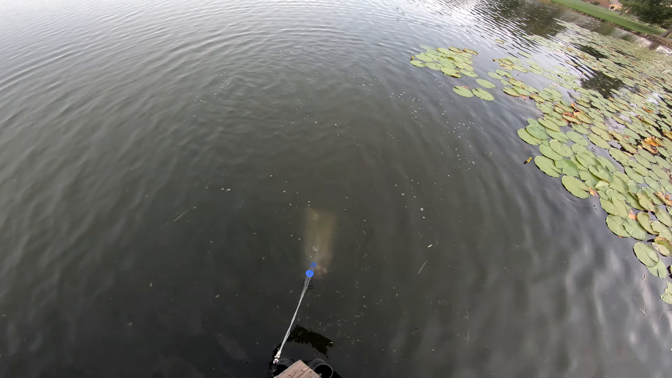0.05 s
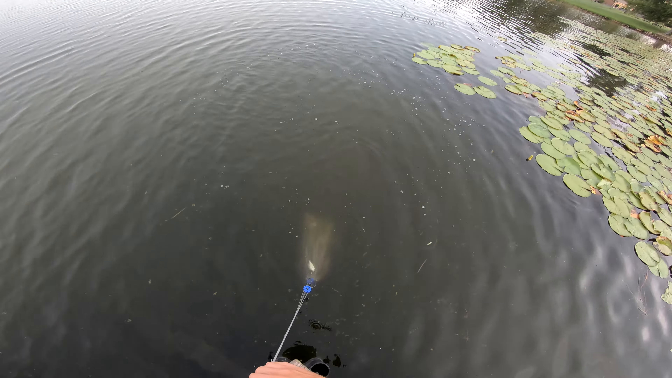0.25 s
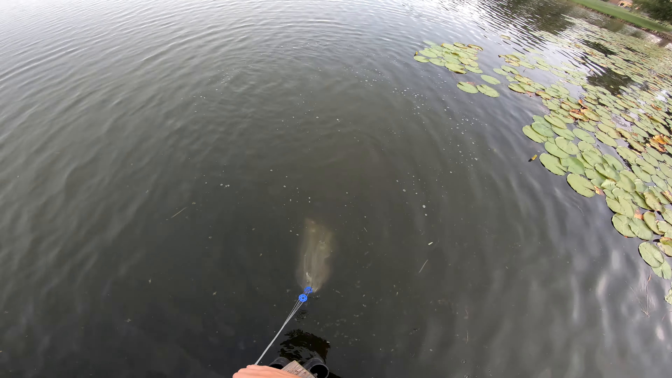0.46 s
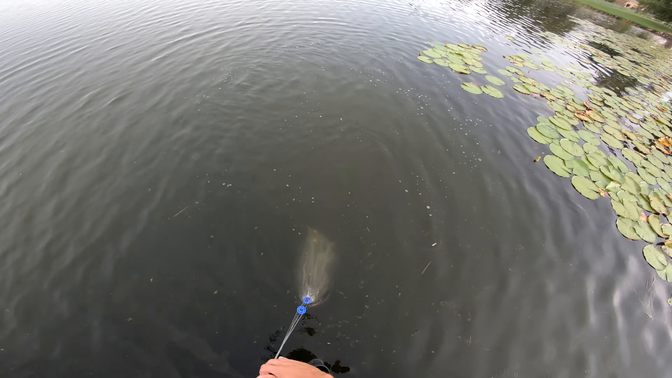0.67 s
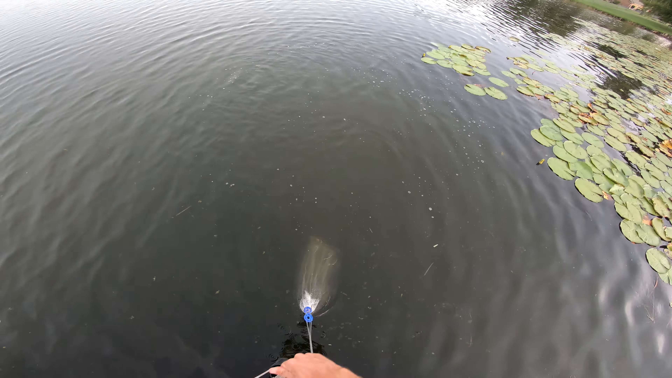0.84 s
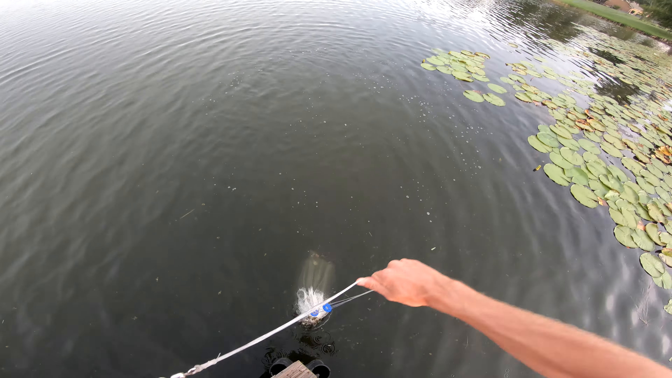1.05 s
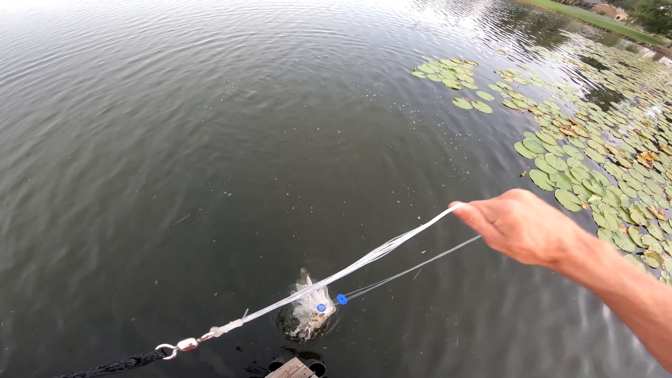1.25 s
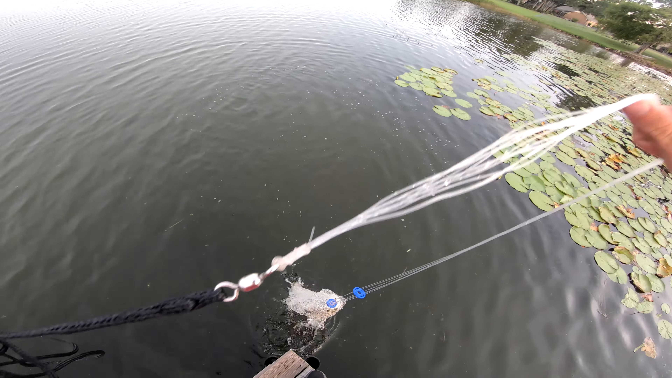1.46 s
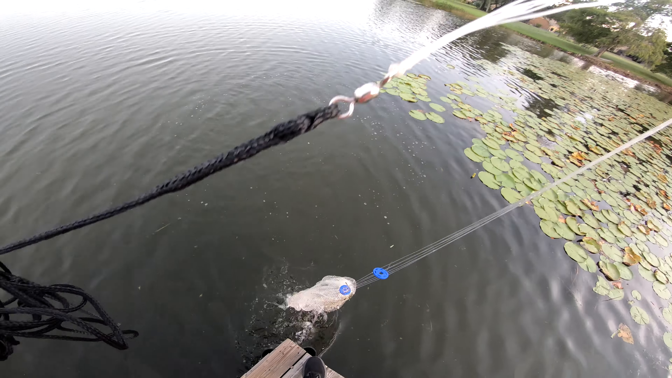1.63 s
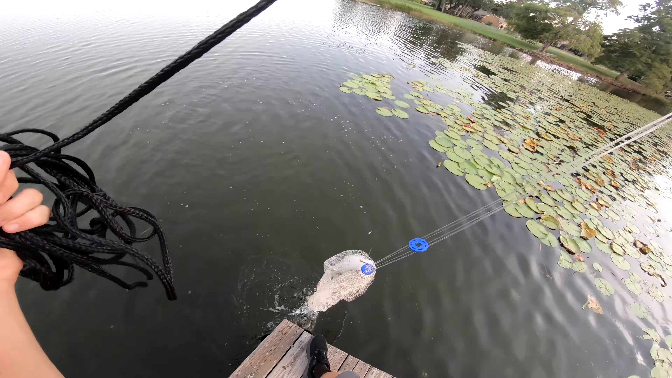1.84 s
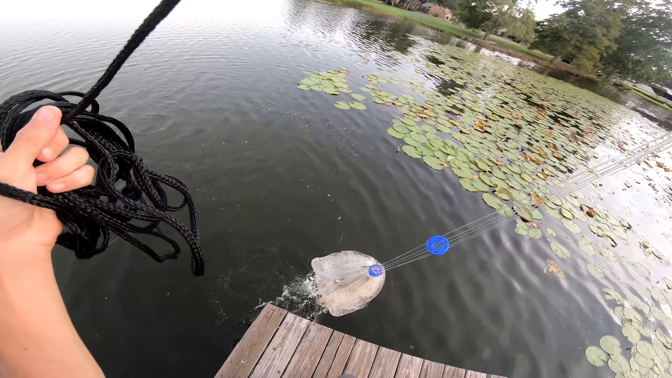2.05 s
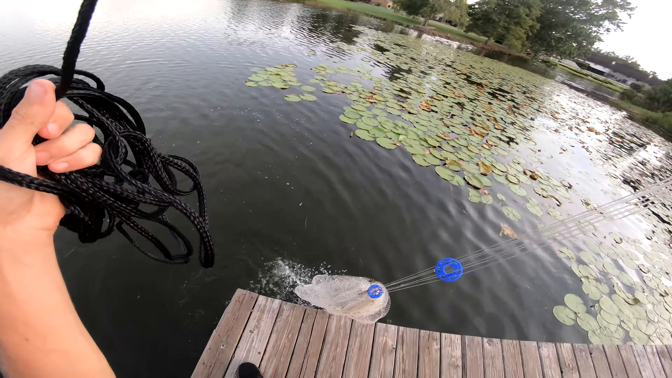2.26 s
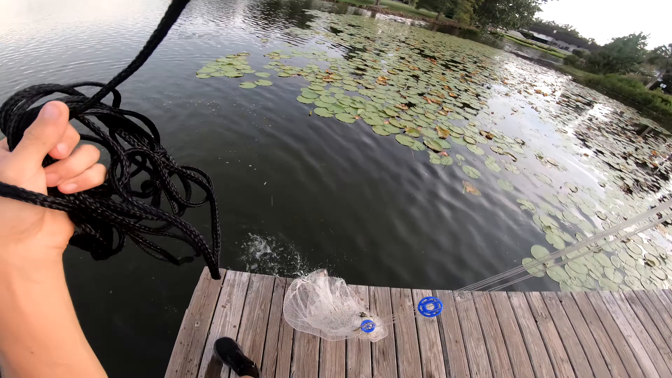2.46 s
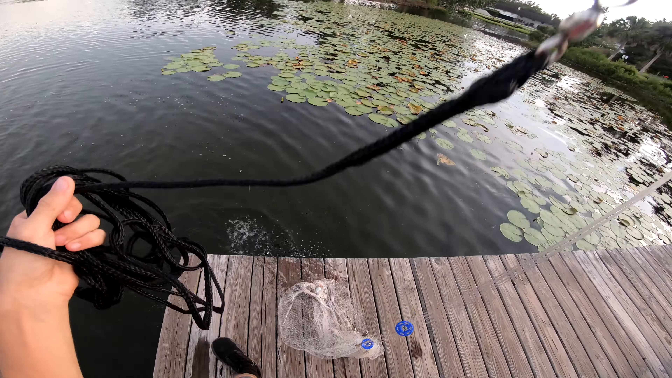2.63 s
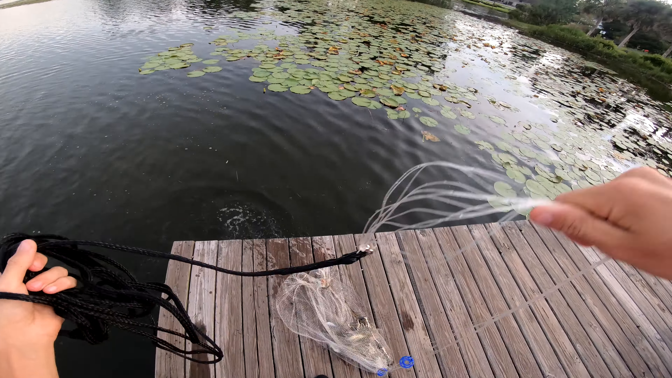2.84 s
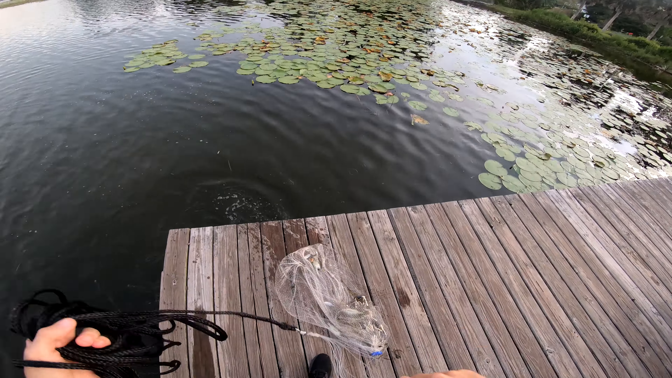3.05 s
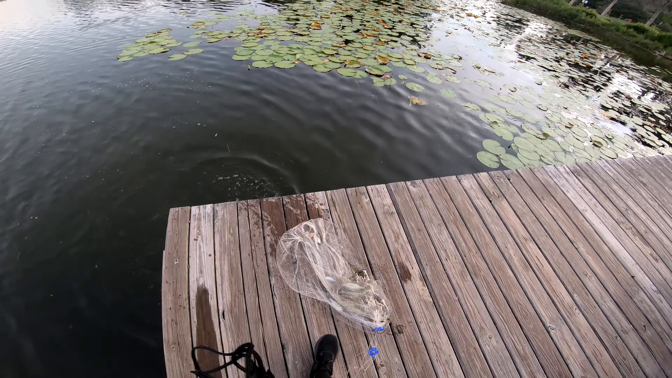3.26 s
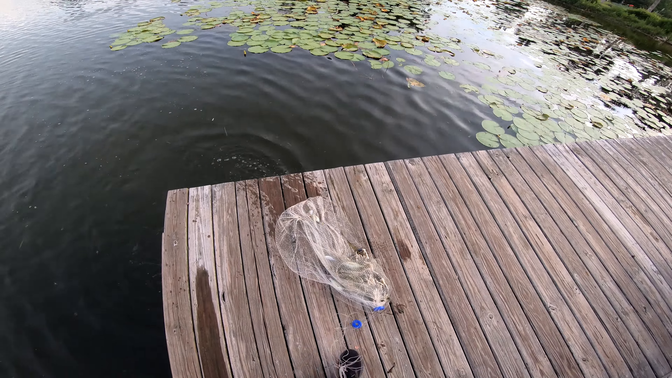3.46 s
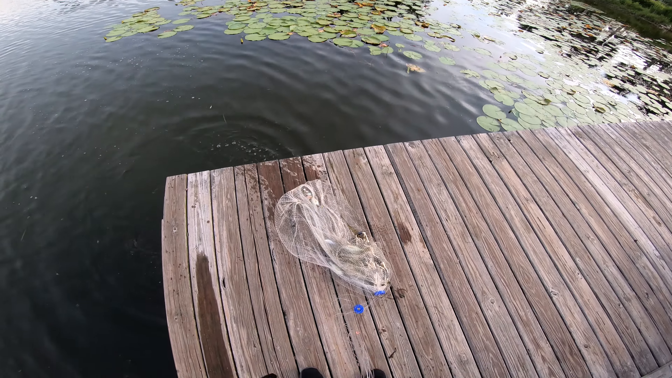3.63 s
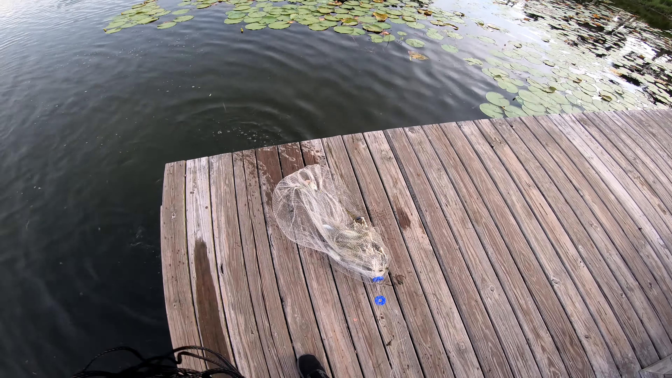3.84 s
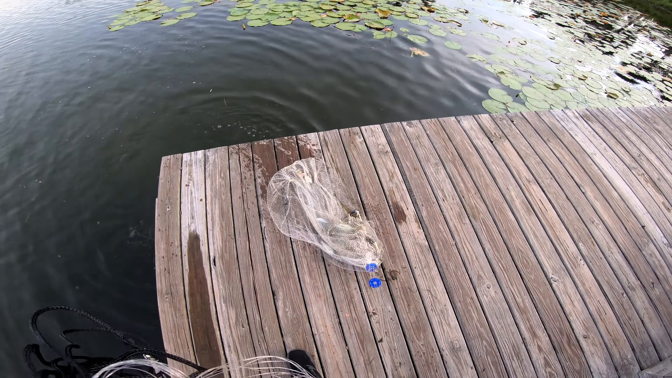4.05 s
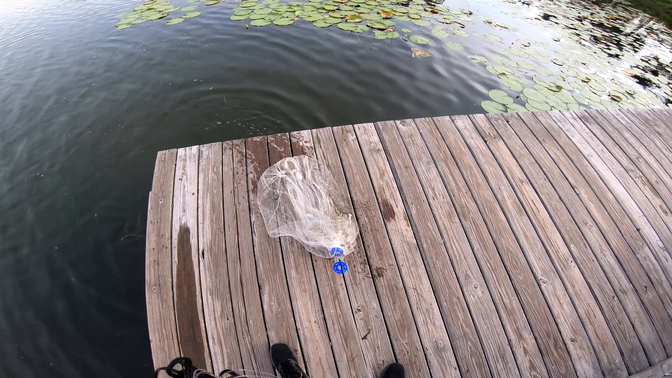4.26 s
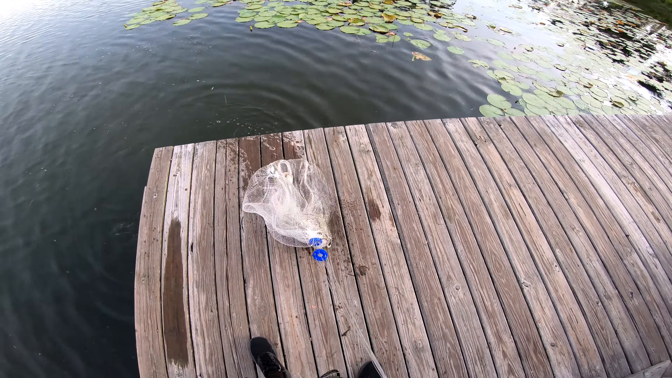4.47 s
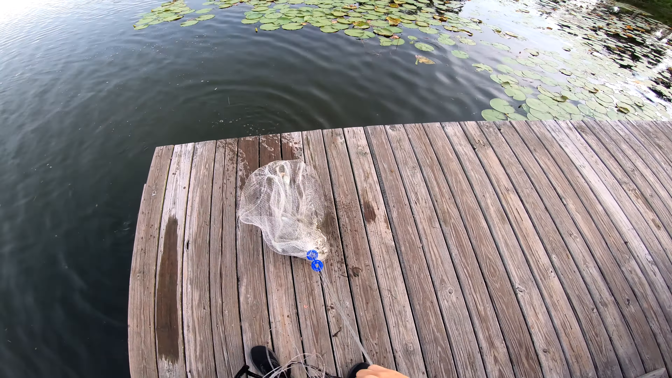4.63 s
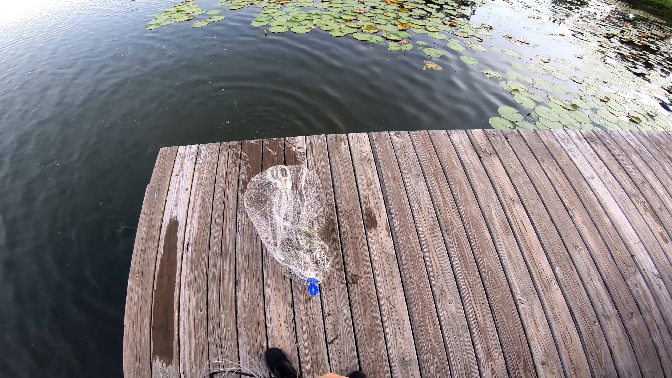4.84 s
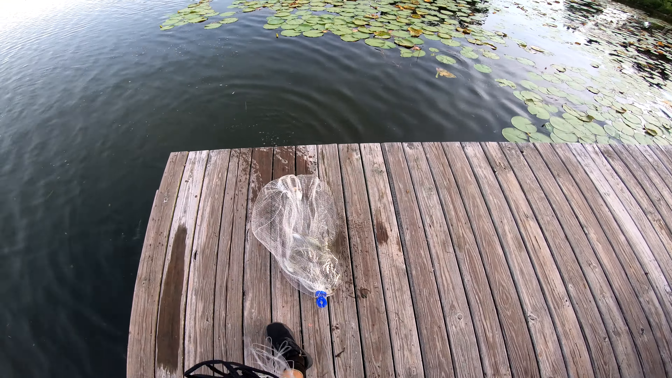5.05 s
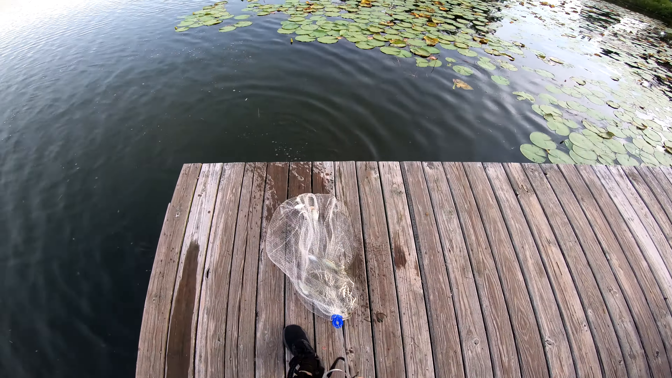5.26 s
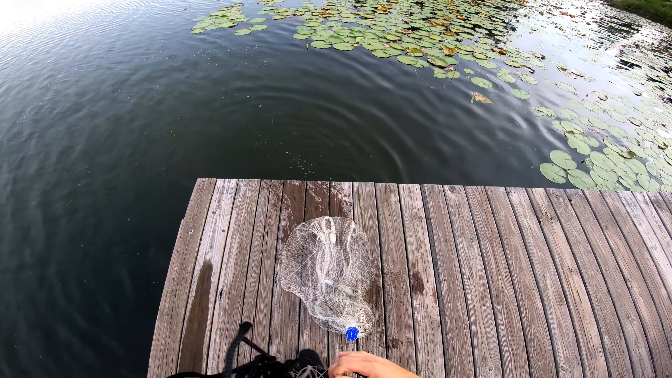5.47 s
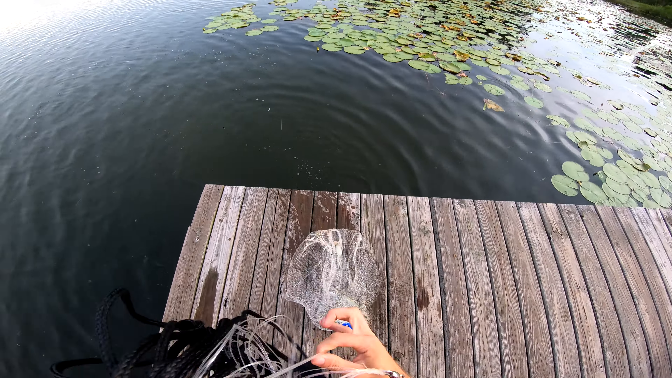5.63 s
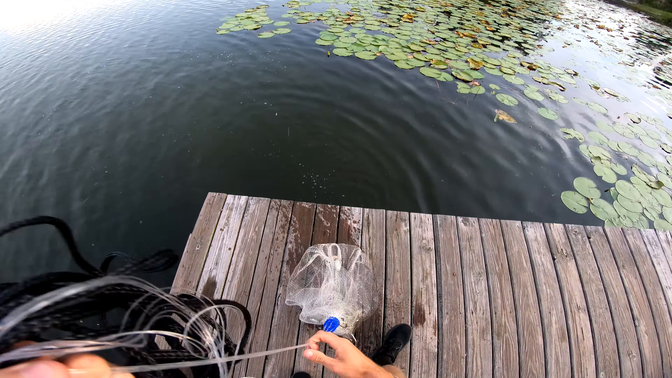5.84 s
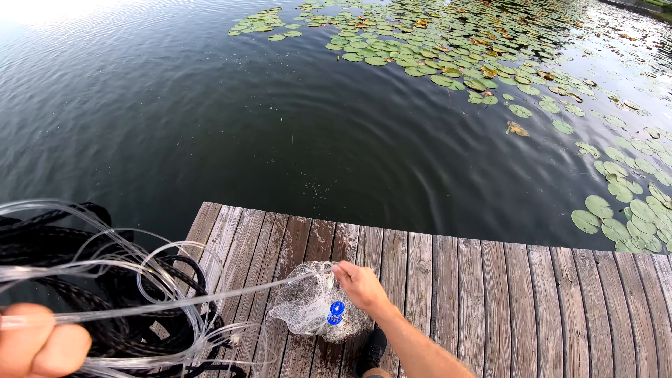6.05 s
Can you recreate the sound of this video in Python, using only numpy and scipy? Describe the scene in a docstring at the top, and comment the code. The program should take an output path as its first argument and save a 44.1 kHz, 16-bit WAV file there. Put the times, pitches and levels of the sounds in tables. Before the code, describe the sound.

Rope scuffs softly and drops tick as a wet cast net is hauled from a pond. Water streams off it, bubbling and spattering, then the lead weights thud and rattle onto a wooden dock while wind bumps the microphone. A plastic piece clacks, the weights land again and the net keeps dripping. The handling sounds are close, with faint birds and a low hum in the distance.

```python
"""A wet cast net is hauled out of a pond and its lead line drops on a plank dock, twice.
Over distant hum and hiss, rope scuffs by friction and drops, lines and rings tick. From 1.3 s water
streams off the net as ringing bubbles and spray. Wind thumps the right microphone port, and at 2.7 s
the weights excite the modes of the planks. Far birds begin to whistle; at 4.4 s the net's plastic horn
clacks, the weights land again and the net drips on. Near sounds are muffled at the left port."""
import sys
import numpy as np
from scipy import signal
from scipy.fft import rfft, irfft
from scipy.io import wavfile
from scipy.ndimage import uniform_filter1d

SR = 44100
rng = np.random.default_rng(int(sys.argv[2]) if len(sys.argv) > 2 else 0)


def int16_out(signal):
    """Quantize to a 16-bit WAV file."""
    q = np.round(np.clip(np.atleast_2d(signal).T, -1, 1) * 32767)
    wavfile.write(sys.argv[1], SR, q.astype(np.int16))


N = 269010

# water streaming off the moving mesh: time_s, gurgle_db, spray_db, fizz_db
WATER_FLOW = [(0.0, -51.5, -58, -60.5), (0.85, -62, -67.5, -70.5), (1.29, -50, -50, -60),
              (1.5, -44, -49, -58), (1.75, -41.5, -46, -54), (2.48, -50, -44, -49), (2.65, -52, -50, -52),
              (2.9, -57, -55.5, -58), (3.36, -62.5, -69, -74), (3.5, -54, -60, -69), (3.84, -64, -61, -64),
              (4.21, -59.5, -60, -60), (4.38, -56, -52, -58), (4.6, -50, -58, -61), (5.03, -62, -66, -63.5),
              (5.6, -56, -64, -62.5), (5.76, -62.5, -62, -68), (6.1, -59, -64, -63)]


def amp(db):
    """Amplitude ratio of a level in decibels."""
    return 10 ** (np.asarray(db) / 20)


def unit_rms(x):
    """Normalisation to unit mean power."""
    return x / np.sqrt(np.mean(x ** 2) + 1e-20)


def spectrum_at(points, hz):
    """Interpolation of a spectrum on a logarithmic frequency axis."""
    point_hz, value = np.transpose(points)
    return np.interp(np.log(hz + 1), np.log(point_hz + 1), value)


def envelopes(rows):
    """Linear interpolation in time of each column after the first."""
    times, *columns = np.transpose(rows)
    return [np.interp(np.arange(N) / SR, times, column) for column in columns]


def coloured(x, colour):
    """Zero-phase filtering by rows of frequency_hz, gain_db."""
    return irfft(rfft(x) * amp(spectrum_at(colour, np.fft.rfftfreq(N, 1 / SR))), N)


def add(mix, start_s, sound):
    """Superposition of a sound on the mix."""
    part = mix[max(round(start_s * SR), 0):][:len(sound)]
    part += sound[:len(part)]


def ring(hz, t60, glide=0., size=4096):
    """Damped oscillation: in t60 seconds it falls 60 dB and its pitch rises by the fraction 2 * glide."""
    t = np.arange(size) / SR
    return np.sin(2 * np.pi * hz * t * (1 + glide * t / t60)) * amp(-60 * t / t60)


def grains(colour, cycles, per_s, spread_db, wash, pitches=12):
    """Shot noise: random impulses ring small resonators over a smooth wash of the same colour."""
    out = np.zeros(N)
    for hz in np.geomspace(colour[1][0], colour[-2][0], pitches):
        sizes = amp(spread_db * np.minimum(rng.exponential(1, N), 5))
        impulses = sizes * (rng.random(N) < per_s / pitches / SR)
        out += signal.oaconvolve(impulses, np.sqrt(hz) * ring(hz, cycles / hz, glide=.17, size=2048))[:N]
    smooth = unit_rms(coloured(rng.standard_normal(N), colour))
    return unit_rms(unit_rms(coloured(out, colour)) + wash * smooth)


def distant_air():
    """Partly coherent noise: the hum is alike at both ports, the drifting hiss largely independent."""
    colour = [(29, -40), (50, 1), (70, 2), (98, -3.5), (140, -1.5), (221, -6.5), (268, -8), (330, -16),
              (718, -25), (1110, -34), (2100, -55), (3000, -48.5), (4000, -43), (5500, -47.5),
              (7000, -53.5), (7700, -42), (9500, -43), (11000, -56.5), (15500, -67)]  # hum and hiss: frequency_hz, level_db
    likeness = [(60, 0.97), (180, 1), (550, 0.81), (1650, 0.033), (4970, 0.07), (15000, 0.31)]  # between the ports: frequency_hz, coherence
    balance = [(60, 0), (380, -3), (900, 6.5), (2400, 12), (6500, 6), (7800, -25.5), (15000, -25)]  # frequency_hz, left_minus_right_db
    insects = [(0, -1), (1.5, -1.), (3.2, -0.5), (4.6, 1.5), (5.4, 3.5), (6.1, 3)]  # swell of the high hiss: time_s, gain_db
    frames, hz = N // 256 + 5, np.fft.rfftfreq(1024, 1 / SR)
    right_re, right_im, own_re, own_im, patches = rng.standard_normal((frames, 513, 5)).T
    patches = unit_rms(uniform_filter1d(uniform_filter1d(patches, 14, axis=0), 16, axis=1))
    coherence = np.clip(spectrum_at(likeness, hz), -1, 1)[:, None]
    right = right_re + 1j * right_im
    left = coherence * right + np.sqrt(1 - coherence ** 2) * (own_re + 1j * own_im)
    swell_db = (hz > 7400)[:, None] * np.interp(np.arange(frames) * 256 / SR, *np.transpose(insects))
    lean_db = spectrum_at(balance, hz)[:, None] / 2
    level_db = spectrum_at(colour, hz)[:, None] + swell_db + 1.05 * patches
    spectra = np.array([left * amp(level_db + lean_db), right * amp(level_db - lean_db)])
    return amp(-42) * unit_rms(signal.istft(spectra, nperseg=1024, noverlap=768)[1][:, :N])


def wind():
    """Pressure fluctuations: independent rumble at each port, and thumps mainly at the right one."""
    strength = [(0.0, -43), (1.0, -64), (1.73, -39), (1.93, -52), (2.28, -47), (2.36, -34), (2.5, -39),
                (2.62, -26), (3.07, -48), (3.64, -40), (3.86, -44), (4.4, -33), (4.62, -47), (5.88, -56),
                (6.1, -42)]  # rumble: time_s, level_db
    colour = [(12, 4), (30, -9.5), (60, 8), (100, -8.5), (160, -12), (300, -55)]  # rumble: frequency_hz, gain_db
    thumps = [(2.355, -19, "in"), (2.602, -22.5, "in"), (2.631, -6, "in"), (2.669, -15, "in"),
              (2.7315, -8, "in"), (2.757, -3, "in"), (2.866, -16.5, "in"), (2.951, -12.5, "in"),
              (3.346, -21, "out"), (3.372, -19, "out"), (3.466, -23.5, "in"), (3.661, -15.5, "out"),
              (3.685, -20, "in"), (3.705, -18.5, "out"), (3.835, -18, "in")]  # pressure pulses: time_s, level_db, direction
    lumps = [unit_rms(uniform_filter1d(rng.standard_normal(N), 900)) for _ in range(2)]
    rumble = np.array([unit_rms(coloured(amp(5.5 * lump) * rng.standard_normal(N), colour))
                       for lump in lumps])
    pressure, t = np.zeros(N), np.arange(1764) / SR - .02
    for time_s, db, direction in thumps:
        width_s = .0012 - .00006 * db  # weaker thumps are broader
        sign = 1 if direction == "in" else -1
        add(pressure, time_s - .02, sign * amp(db) * np.exp(-(t / width_s) ** 2))
    bass_cut = signal.cheby1(2, 4.0, 55, "highpass", fs=SR)  # makes each pulse overshoot
    rumble *= amp(envelopes(strength)[0]) * amp([[-3], [3]])
    return rumble + signal.lfilter(*bass_cut, pressure) * amp([[-16], [2.5]])


def bird_call(length_s, first_hz, last_hz, db, throbs_per_s, fuzz, bend):
    """A modulated sine: it glides early (bend under 1) or late, swells, throbs and is roughened by noise."""
    t = np.arange(0, length_s, 1 / SR)
    hz = first_hz + (last_hz - first_hz) * (t / length_s) ** bend
    swell = amp(db - 4 * (2 * t / length_s - 1) ** 2) * signal.windows.tukey(len(t), .15)
    throb = np.abs(np.cos(np.pi * throbs_per_s * t - .4)) ** .4
    rasp = 1 - fuzz + fuzz * unit_rms(uniform_filter1d(rng.standard_normal(SR // 4), 90))[:len(t)]
    return np.sqrt(2) * swell * throb * rasp * np.sin(2 * np.pi * np.cumsum(hz) / SR)


def birds():
    """Far calls, placed to the right by a level difference between the ports."""
    # three kinds of call: start_s, length_s, first_hz, last_hz, level_db
    whistles = [(3.44, .195, 2640, 2550, -54), (5.722, .123, 2620, 2540, -57)]
    chirps = [(3.238, .042, 2550, 2100, -63), (5.522, .04, 2520, 2120, -61), (3.872, .043, 3200, 3100, -60)]
    wheezes = [(5.01, .065, 6100, 6500, -62), (5.18, .075, 6200, 6600, -61), (5.322, .05, 6600, 6350, -60),
               (5.535, .075, 6550, 6450, -64)]
    out = np.zeros(N)
    for calls, throbs_per_s, fuzz, bend in [(whistles, 22, .1, .4), (chirps, 3, .5, 1.8),
                                            (wheezes, 3, .7, .7)]:
        for start_s, *call in calls:
            add(out, start_s, bird_call(*call, throbs_per_s, fuzz, bend))
    return out * amp([[-2.5], [2.0]])


def rope_scuffs():
    """Friction noise: rope and mesh rub in short grains, and each stroke swells and sinks."""
    strokes = [(.02, .26, -53), (3.83, .24, -59), (4.85, .17, -56)]  # start_s, length_s, level_db
    colour = [(500, -23), (800, 3), (1200, 10), (1800, 7), (2500, 4), (3600, -30)]  # rubbing: frequency_hz, gain_db
    envelope = np.zeros(N)
    for start_s, length_s, db in strokes:
        position = np.linspace(-1, 1, round(length_s * SR))
        add(envelope, start_s, amp(db - 12 * position ** 2) * signal.windows.tukey(len(position), .2))
    return envelope * grains(colour, cycles=9., per_s=1500, spread_db=2.5, wash=1.2, pitches=8)


def drips(count=60):
    """Random arrivals: rows for ticks() whose level follows the spray off the net."""
    when, size, pitch = rng.random((count, 3)).T
    starts_s = when * N / SR
    flow_s, _, spray_db, _ = np.transpose(WATER_FLOW)
    levels_db = np.interp(starts_s, flow_s, spray_db) + 12 + 8 * (size - .5)
    pitches_hz = np.interp(pitch, [0, 1], [2400, 3900])
    return list(zip(starts_s, levels_db, pitches_hz, [-22] * count))


def ticks():
    """Small impacts excite heavily damped modes, with a trailing crackle and a brief spit of treble."""
    impacts = [(0.181, -36.5, 3100, -9), (0.249, -40.5, 2300, -6), (0.3082, -39, 2130, -11),
               (0.381, -40, 2620, -11), (0.4213, -35, 2170, -32), (0.56, -35.5, 2220, -28),
               (0.635, -40.5, 2310, -26), (0.7841, -45.5, 2240, -5), (1.1043, -39.5, 3680, -8),
               (1.1692, -33.5, 3920, -15), (1.262, -33.5, 2450, -31), (1.4024, -30, 2700, -17),
               (1.616, -22, 3530, -27), (1.7635, -31, 2390, -16), (1.7847, -26, 3700, -31),
               (1.936, -28.5, 2840, -16), (2.033, -23, 2900, -41), (2.115, -26.5, 2940, -31),
               (2.1662, -30.5, 3100, -6), (2.188, -26, 2900, -25), (2.1975, -23, 2780, -33),
               (2.2188, -23.5, 3200, -31), (2.2468, -25, 3060, -8), (2.2817, -29.5, 3400, -14),
               (2.3244, -27, 3200, -22), (2.377, -26, 3080, -22), (2.431, -25, 1860, -9),
               (2.447, -23.5, 3180, -23), (2.5122, -25, 3630, -26), (2.5452, -27.5, 3120, -31),
               (2.6792, -25, 1940, -29), (2.707, -27, 2930, -19), (2.7261, -19, 2860, -28),
               (2.861, -31.5, 3960, -27), (3.1168, -40, 2940, -22), (3.223, -44, 2970, -19),
               (3.4716, -42.5, 2640, -2), (3.5436, -38, 2500, -15), (3.6346, -39.5, 2330, -13),
               (3.6915, -34.5, 3350, -10.5), (3.9995, -35, 2280, -18), (4.057, -42, 2800, -15),
               (4.149, -36, 3230, -20), (4.1828, -35, 3220, -11), (4.2356, -45.5, 3040, 6.5),
               (4.2626, -38, 3850, -3), (4.476, -31, 3090, -9), (4.503, -31.5, 1930, -21),
               (4.593, -36.5, 2670, -13), (4.667, -28, 2770, -25), (4.6902, -27.5, 2640, -32),
               (4.7303, -30.5, 3460, -30), (4.775, -36.5, 3250, -12), (4.8187, -39, 3730, -18),
               (4.8904, -36, 3120, -9), (5.1438, -40.5, 3920, -11), (5.2644, -40, 3400, -15),
               (5.299, -33, 2800, -15), (5.4849, -35.5, 2150, -9), (5.8561, -35.5, 2460, -17),
               (5.8696, -31.5, 3750, -26), (5.9236, -35, 2050, -17), (5.954, -37.5, 2700, 2.5),
               (6.0556, -44.5, 2580, -1)]  # drops on wood, rings and lines: start_s, level_db, pitch_hz, treble_db
    modes = [(1.0, 0, .007), (1.3, -3, .004), (1.7, -7, .003), (.75, -4, .004)]  # pitch_ratio, level_db, t60_s
    impacts = impacts + drips()
    out, t = np.zeros(N), np.arange(2048) / SR
    attack = np.minimum(t / .0005, 1)
    treble_band = signal.butter(2, [5500, 10000], "bandpass", fs=SR)
    for start_s, db, hz, treble_db in impacts:
        noise = rng.standard_normal((2, 2048))
        body = sum(amp(mode_db) * ring(hz * ratio, t60, size=2048) for ratio, mode_db, t60 in modes)
        pitch_band = signal.butter(1, [hz * .7, hz * 1.5], "bandpass", fs=SR)
        crackle = unit_rms(signal.lfilter(*pitch_band, noise[0]))
        crackle *= amp(-60 * t / .011) + amp(-3 - 60 * t / .093)
        spit = unit_rms(signal.lfilter(*treble_band, noise[1])) * amp(treble_db - 60 * t / .0091)
        add(out, start_s, amp(db) * (1.2 * body * attack + .2 * crackle + 1.3 * spit))
    return signal.lfilter(*signal.butter(2, 9500, fs=SR), out)  # microphone roll-off above 9.5 kHz


def streaming_water():
    """Bubble resonance: long-ringing bubbles gurgle and rise in pitch; short drops spray and fizz."""
    # spectra of the three layers: frequency_hz, gain_db
    gurgle_colour = [(250, -13), (450, 1.5), (800, 0.5), (1300, -2.5), (1800, -2), (2300, -14.5),
                     (3000, -65)]
    spray_colour = [(1400, -5), (2200, -6), (3000, 0), (3500, 0), (4000, -2), (4400, -7.5), (5200, -6.5),
                    (6500, -36)]
    fizz_colour = [(4000, -3), (5200, 3), (7500, 3), (9500, 0), (11000, -16.5), (14000, -30), (15500, -38)]
    gushes = [(1.61, -34, .01, -8), (2.72, -39, .06, -.7), (4.42, -42, .03, -3), (4.67, -45, .01, -7)]  # the net is jerked or lands: peak_s, gurgle_db, rise_s, layer_step_db
    bubbles = [(1.282, -32, 826, 0.055), (1.411, -27, 745, 0.022), (1.418, -28, 1720, 0.023),
               (1.431, -28.5, 484, 0.18), (1.533, -28, 660, 0.033), (1.549, -35, 620, 0.094),
               (1.641, -27, 550, 0.036), (1.694, -44, 700, 0.043), (1.876, -31.5, 604, 0.093),
               (1.924, -34, 684, 0.06), (1.949, -37, 670, 0.06), (2.085, -26, 1330, 0.02),
               (2.217, -30, 670, 0.03), (2.422, -29, 1350, 0.024), (3.519, -39, 983, 0.065),
               (3.653, -44.5, 858, 0.13)]  # single large bubbles: start_s, level_db, pitch_hz, t60_s
    rise_db, fall_db_per_s, surge_db, surge_s = 14, 150, 1.4, .04
    t, levels = np.arange(N) / SR, amp(envelopes(WATER_FLOW))
    for peak_s, db, rise_s, step_db in gushes:
        shape_db = np.minimum(rise_db * (t - peak_s) / rise_s, fall_db_per_s * (peak_s - t))
        layers_db = db + step_db * np.arange(3)[:, None]
        levels = np.hypot(levels, amp(layers_db + np.maximum(shape_db, -200)))  # powers add
    surges = unit_rms(uniform_filter1d(rng.standard_normal((3, N)), round(surge_s * SR)))
    gurgle, spray, fizz = levels * amp(surge_db * surges)
    out = gurgle * grains(gurgle_colour, cycles=33., per_s=400, spread_db=3.22, wash=.77)
    out += spray * grains(spray_colour, cycles=20., per_s=900, spread_db=3.5, wash=.85)
    out += fizz * grains(fizz_colour, cycles=9., per_s=2500, spread_db=3.8, wash=.9)
    attack = np.minimum(np.arange(4096) / 60, 1)
    for start_s, db, hz, t60 in bubbles:
        add(out, start_s, amp(db) * ring(hz, t60, glide=.06) * attack)
    return out


def horn_clacks():
    """Impulse response of the net's plastic horn, driven by two contacts and short scattered echoes."""
    clacks = [(4.4056, -8.5, 0.4), (4.4185, -38, 0.), (4.4342, -20.5, 1.)]  # horn on planks: start_s, level_db, brightness_db_per_khz
    modes = [(2000, -8, .006), (2700, -3, .008), (3020, 0, .008), (3500, -8, .008), (4100, -2, .007),
             (4810, -6, .006), (5600, -13, .005), (6550, -17, .005), (7950, -19, .004), (9600, -18, .004),
             (12500, -24, .003)]  # frequency_hz, level_db, t60_s
    out, t = np.zeros(N), np.arange(4096) / SR
    for start_s, db, brightness in clacks:
        body = sum((-1) ** k * amp(mode_db + brightness * (hz - 3000) / 1000) * ring(hz, t60)
                   for k, (hz, mode_db, t60) in enumerate(modes))
        body *= np.minimum(t / .00016, 1)  # the contact takes a moment to build
        contacts = rng.standard_normal(4096) * amp(-28 - 60 * t / .05)
        contacts[[0, 46]] = 1, .7  # a hard knock and a second contact 1 ms later
        add(out, start_s, amp(db) * signal.fftconvolve(contacts, body / np.abs(body).max()))
    return out


def lead_weights():
    """Modal excitation: a dying rattle of weights rings the planks; soft blows lose the upper modes."""
    heaps = [(2.678, -11, 0, 0.075), (2.689, -18.5, -14, 0.021), (2.702, -12.5, -17, 0.053),
             (2.724, -18.5, -20, 0.12), (2.924, -17.5, -20, 0.08), (2.931, -21.5, -21, 0.078),
             (2.947, -24, -31, 0.15), (3.509, -42, 8, 0.06), (3.53, -36, 3, 0.043),
             (4.403, -26.5, -8, 0.17), (4.445, -30, 7, 0.16), (4.501, -25.5, 2.5, 0.17),
             (4.545, -33, -5, 0.2), (4.591, -26, -3, 0.14), (4.63, -28.5, -14, 0.15),
             (4.666, -19, 0, 0.081), (4.687, -15, -6, 0.079), (4.704, -19, 0.5, 0.068),
             (4.729, -23, -16, 0.18), (4.83, -27, -15, 0.14)]  # weights landing: start_s, level_db, hardness_db_per_khz, rattle_t60_s
    plank_modes = [(196, -5.5, 0.081), (273, -9, 0.14), (335, -1.5, 0.1), (386, -1, 0.072), (445, -5, 0.14),
                   (512, 1, 0.045), (587, 1, 0.047), (653, -10.5, 0.063), (735, 0.5, 0.063),
                   (782, 3, 0.054), (909, 2, 0.044), (1032, -1, 0.049), (1231, 5, 0.02), (1330, -2, 0.04),
                   (1414, -4, 0.04), (1800, -5, 0.02), (2170, -4, 0.011)]  # frequency_hz, level_db, t60_s
    out, t = np.zeros(N), np.arange(8192) / SR
    attack = np.minimum(t / .00038, 1)  # lead and wet mesh land softly
    for start_s, db, hardness, rattle_t60 in heaps:
        chance, force, spot = rng.random((3, 8192))
        knocks = np.where(chance < .04, 2 * force - 1, 0) * amp(-60 * t / rattle_t60)
        knocks[0] = 2.2  # the first weight lands hardest
        spot = 2 * spot - 1  # each heap lands on another spot, which shifts and weights the modes
        planks = sum((-1) ** k * amp(mode_db + hardness * hz / 1000 + 3 * spot[k])
                     * ring(hz * (1 + .046 * spot[-k]), t60, size=8192)
                     for k, (hz, mode_db, t60) in enumerate(plank_modes))
        thud = signal.fftconvolve(knocks, planks * attack)
        onset_rms = np.sqrt(np.mean(thud[:700] ** 2))
        add(out, start_s, amp(db - 10) * thud / onset_rms)
    return out


def through_ports(sound):
    """Multipath transmission: the left port hears a near sound duller, phase-shifted and partly scattered."""
    # left port relative to right
    likeness = [(100, 1), (600, 0.6), (1400, 0.23), (3000, 0.84), (8000, 0.28)]  # frequency_hz, coherence
    muffling = [(60, -7), (300, -0.5), (700, -8), (1300, -10), (2400, -5.5), (4400, -3.5), (6000, -10.5),
                (8000, -14.5), (15000, -22)]  # frequency_hz, gain_db
    phase_shift = [(0, 0), (690, -.3), (1120, .6), (2580, .2), (3530, -.5), (5400, -2.8), (9000, -3),
                   (15000, -6)]  # frequency_hz, phase_rad
    hz = np.fft.rfftfreq(N, 1 / SR)
    echoes = rng.standard_normal(2400) * amp(-60 * np.arange(2400) / 2200)
    scattered = rfft(echoes / np.linalg.norm(echoes), N)
    direct = np.exp(1j * spectrum_at(phase_shift, hz))
    coherence = np.clip(spectrum_at(likeness, hz), 0, 1)
    gain = amp(spectrum_at(muffling, hz))
    left = gain * (coherence * direct + np.sqrt(1 - coherence ** 2) * scattered)
    mean_gain = (1 + gain) / 2
    return irfft(rfft(sound) * np.array([left, np.ones(len(hz))]) / mean_gain, N)


def scene():
    """Superposition of the near sources, each by its own paths, on birds, wind and distant air."""
    sources = (streaming_water, ticks, horn_clacks, lead_weights, rope_scuffs)
    near = sum(through_ports(source()) for source in sources)
    return near + birds() + wind() + distant_air()


def record(dry):
    """Low-pass filtering: the microphone's treble roll-off, then a steep band limit."""
    dulled = signal.lfilter(*signal.butter(4, 14500, fs=SR), dry)
    band_limit = signal.firwin(511, 15700, window=("kaiser", 9), fs=SR)
    return signal.oaconvolve(dulled, band_limit[None], "same")


dry = scene()
out = record(dry)
int16_out(out)
```